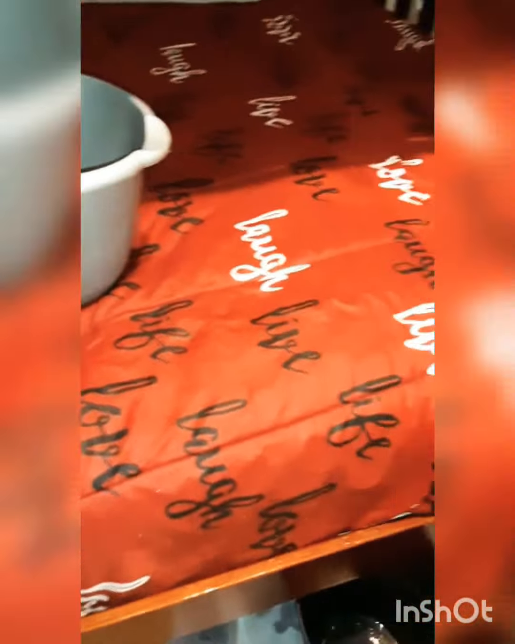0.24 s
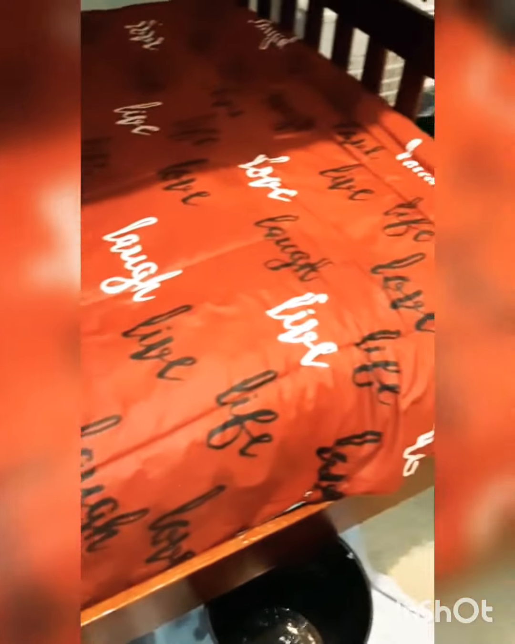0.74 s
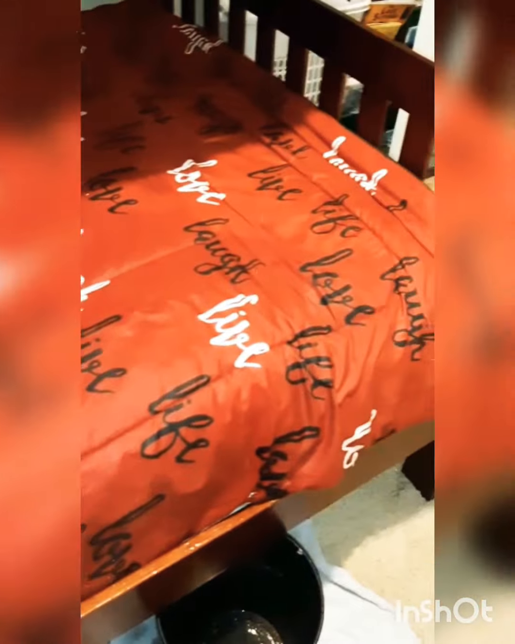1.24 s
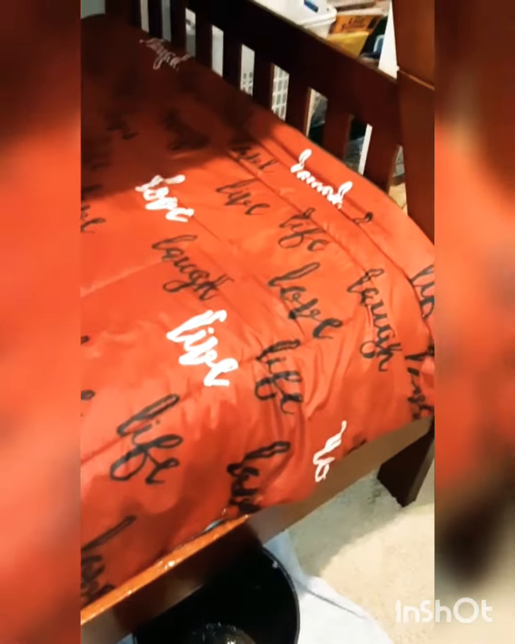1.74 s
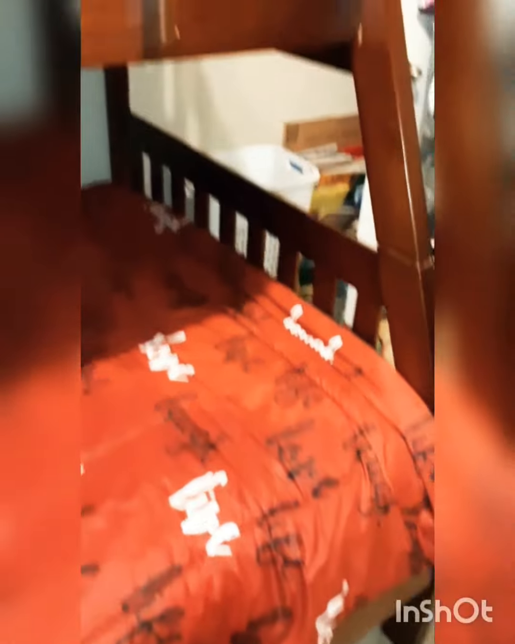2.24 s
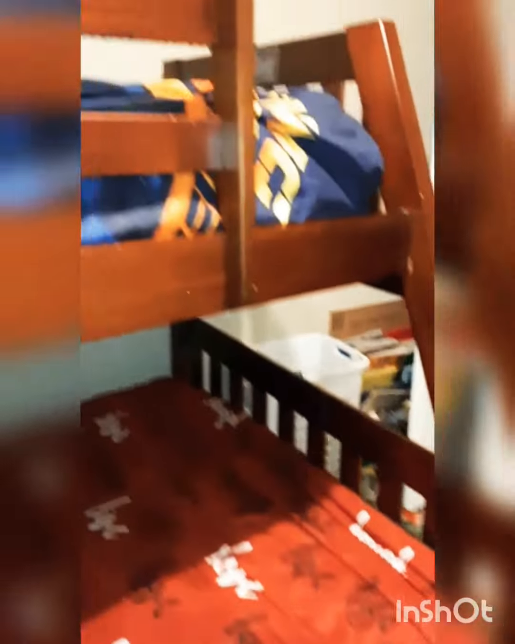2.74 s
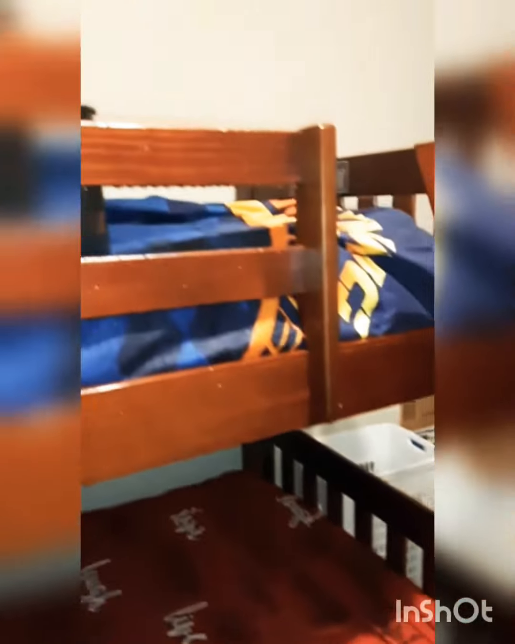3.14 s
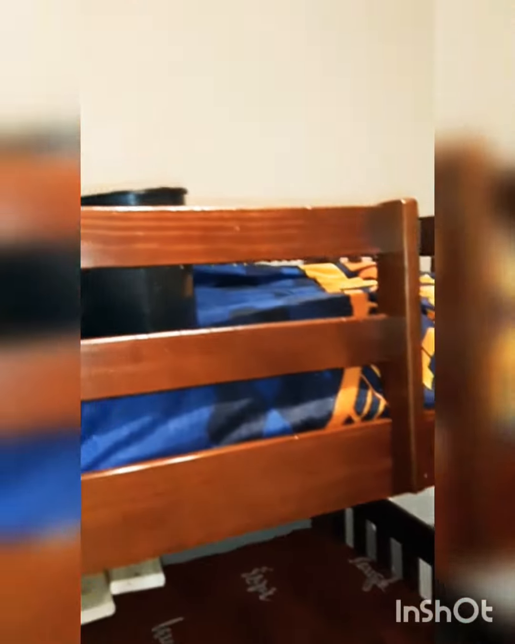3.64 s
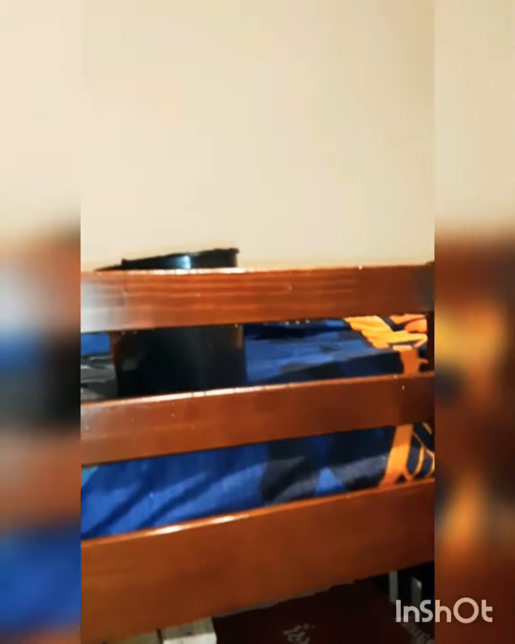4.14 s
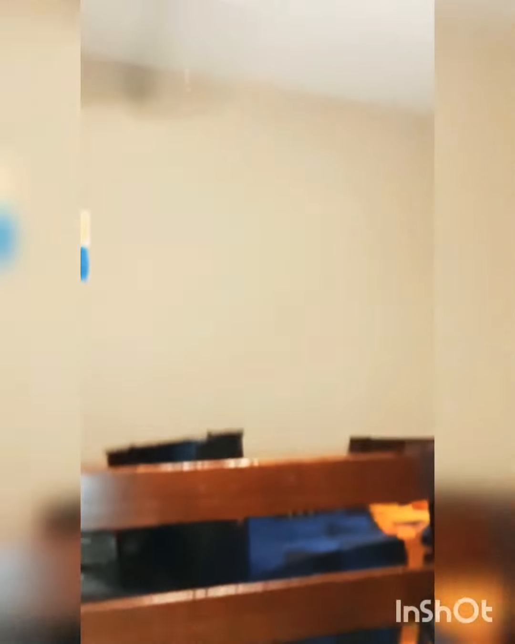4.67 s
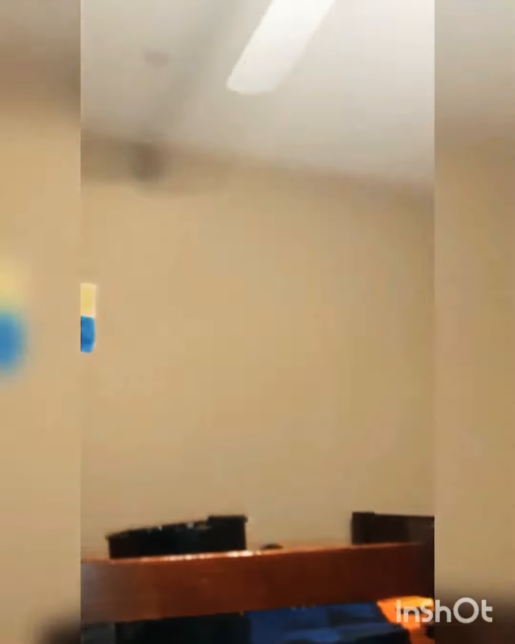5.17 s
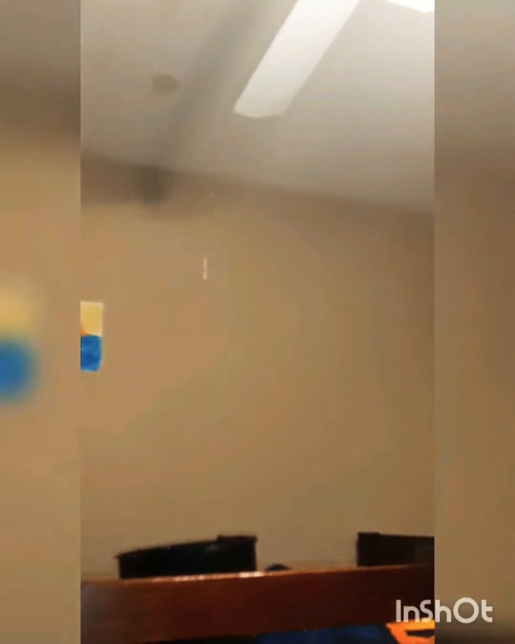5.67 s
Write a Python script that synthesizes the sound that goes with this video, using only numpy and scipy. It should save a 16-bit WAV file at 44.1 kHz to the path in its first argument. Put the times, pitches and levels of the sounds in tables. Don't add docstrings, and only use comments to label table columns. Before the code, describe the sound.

Water drips rapidly and unevenly into a part-filled bucket in a quiet bedroom, heard from close by on a slowly turning handheld stereo microphone. From 0 to 1 s come light ticks, small splashes and a few plinks, with a small handling click near 0.35 s. Around 1.2 to 1.4 s, stronger drops splash, followed by hollow glugs; another firm one lands near 1.9 s. A tight cluster of plops and bright spray comes at 2.4 to 2.7 s. From about 3 s the dripping thickens, with clear high plinks near 3.1, 3.9, 4.25 and 4.6 s, and a faint puff of air around 3.25 s. A sharp bubbling pop sounds near 5.25 s, then quick plinks and splashes continue to the end, about 5.9 s. Fine crackling spray, short room reflections, dull finger taps and a barely audible hum fill the background.

```python
import sys
import numpy as np
from scipy import signal
from scipy.fft import rfft, irfft
from scipy.io import wavfile
from scipy.ndimage import uniform_filter1d, map_coordinates

SR = 44100
rng = np.random.default_rng(int(sys.argv[2]) if len(sys.argv) > 2 else 0)


def field_ratio(decibels):
    return 10 ** (np.asarray(decibels, dtype=float) / 20)


def dump_mix(stems):
    frames = np.atleast_2d(stems).T
    limited = np.clip(frames, -1, 1)
    pcm = np.round(limited * 32767).astype(np.int16)
    wavfile.write(sys.argv[1], SR, pcm)


N = 260631

# (frequency [Hz], density [dB per Hz])
SPRAY_SPECTRUM = [(880, -19), (1500, -2), (1850, -13.5), (2010, 3.5), (2170, -5), (2530, -1.5),
                  (3380, -7.5), (4430, -6.5), (6890, -8), (7770, -8), (8860, -17), (11700, -2), (15100, -8),
                  (16000, 12.5), (16500, -62)]


def at_hz(points, hz):
    table_hz, values = np.transpose(points)
    return np.interp(np.log(hz), np.log(table_hz), values)


def in_time(rows):
    s, *columns = np.transpose(rows)
    return [np.interp(np.arange(N) / SR, s, column) for column in columns]


def band_of(x, order, edges_hz, kind="band"):
    return signal.sosfilt(signal.butter(order, edges_hz, kind, fs=SR, output="sos"), x)


def coloured(x, spectrum):
    hz = np.maximum(np.arange(N // 2 + 1) * SR / N, 1)
    y = irfft(rfft(x) * field_ratio(at_hz(spectrum, hz)), N)
    return y / np.std(y)


def resonance(x, hz, width_hz):
    r = np.exp(-np.pi * width_hz / SR)
    zeros = (1 - r * r) / 2 * np.array([1, 0, -1])
    poles = [1, -2 * r * np.cos(2 * np.pi * hz / SR), r * r]
    return signal.lfilter(zeros, poles, x)


def add(out, s, sound):
    i = min(round(s * SR), N)
    out[..., i:i + len(sound)] += sound[:N - i]


def room_tone():
    # (frequency [Hz], level [dB])
    air_spectrum = [
        (12, -48),
        (20, -11),
        (107, -1.5),
        (209, -9),
        (690, 6.5),
        (1350, 7),
        (1500, -1.5),
        (1950, 5),
        (3300, -120),
    ]
    # (time [s], level [dB])
    far_hum = [
        (0, -117),
        (4.2, -77),
        (4.5, -69),
        (5.91, -81),
    ]
    common, left, right, rumble, hum = rng.standard_normal((5, N))
    air = np.array([coloured(common + 1.02 * own, air_spectrum) for own in (left, right)])
    air[1] += field_ratio(-24) * coloured(rumble, [(15, 12), (40, -8), (60, 26), (90, 19), (150, -19)])
    steady_hum = field_ratio(-50) * resonance(hum, 115.4, width_hz=24)
    appliance = field_ratio(in_time(far_hum)[0] + 29) * resonance(hum, 166.6, width_hz=5)
    return field_ratio(-60) * air + steady_hum + appliance


def droplets(per_s, spread_db):
    sizes = field_ratio(spread_db * np.minimum(rng.exponential(1, N), 4)) * rng.choice([-1, 1], N)
    spray = coloured(sizes * (rng.random(N) < per_s / SR), SPRAY_SPECTRUM)
    cuts = ((3000, "low"), ([3000, 8800], "band"), (8800, "high"))
    return np.array([band_of(spray, 3, hz, kind) for hz, kind in cuts])


def patchy(x):
    patchy_db, drift = 1.8, 1300
    edges, out = np.geomspace(900, 17000, 9), 0
    chance = uniform_filter1d(rng.standard_normal(N), size=drift) * np.sqrt(drift)
    for k, band in enumerate(zip(edges, edges[1:])):
        gain = field_ratio(patchy_db * np.clip(np.roll(chance, k * N // 8), -2, 2))
        out = out + gain * band_of(x, 2, band)
    return out


def patter(per_s):
    sizes = field_ratio(2.5 * np.minimum(rng.exponential(1, N), 1.8)) * (rng.random(N) < per_s / SR)
    pitches, dealt = np.geomspace(2800, 15000, 8), rng.integers(0, 8, N)
    rings = 0
    for k, hz in enumerate(pitches):
        rings = rings + resonance(sizes * (dealt == k) + 1e-18, hz, hz / 3) / hz
    return field_ratio(-54) * coloured(rings, SPRAY_SPECTRUM)


def bubble(db, hz, rise, life_ms, onset_ms, shed_ms):
    life = max(life_ms, 2) / 1000
    t = np.arange(int(2 * life * SR)) / SR
    pitch = hz * 2 ** (rise * np.minimum(t / life, 1.2))
    since = t % (shed_ms / 1000)
    onset = 1 - np.exp(-1000 * since / onset_ms)
    decay = np.exp(-1.5 * (t / life) ** 2 - since / 0.098)
    return field_ratio(db) * onset * decay * np.sin(2 * np.pi * np.cumsum(pitch) / SR)


def bubbles(table, start_share, onset_ms, gain_db, swarm_db, below, above, swarm_ms):
    out, chance = np.zeros(N), rng.random((len(table), 5, 4))
    shedding = rng.uniform(14, 32, len(table))
    for (s, db, hz, rise, life_ms), swarm, shed_ms in zip(table, chance, shedding):
        add(out, s, bubble(db + gain_db, start_share * hz, rise, life_ms, onset_ms, shed_ms))
        for later, height, strength, climb in swarm:
            pitch_hz = hz * 2 ** (rise * later - below + (below + above * rise) * height)
            small_db = db + swarm_db - 13.8 * strength
            small = bubble(small_db, pitch_hz, 0.34 * climb, 12000 / pitch_hz, onset_ms, shed_ms)
            add(out, s + later ** 2 * (life_ms + swarm_ms) / 1000, small)
    return out


def large_bubbles():
    # (time [s], peak level [dB], first pitch [Hz], life [ms])
    glugs = [(.14, -62, 700, 60), (.51, -45, 1280, 36), (1.3, -53.5, 413, 117), (1.372, -45.5, 1098, 21),
             (1.407, -45, 690, 40), (1.56, -55, 685, 54), (1.84, -50, 1206, 43), (1.894, -48.5, 723, 35),
             (1.935, -40.5, 1038, 19.5), (.01, -62, 972, 53), (2.424, -38.5, 584, 12.1),
             (2.686, -48, 642.5, 40), (4.735, -45, 1430, 11), (2.957, -49, 602, 96),
             (2.975, -43.5, 900, 30), (3.2, -49, 602.6, 67), (3.575, -56.5, 723, 55), (3.941, -49, 700, 20),
             (4.039, -50.5, 722, 42), (4.24, -44, 616.5, 41.5), (4.731, -43.5, 1023, 38),
             (5.098, -53, 858, 43), (5.145, -55, 482, 21), (5.258, -32, 1094, 10), (5.26, -61, 639, 49),
             (5.33, -42, 1200, 20), (5.39, -49.5, 814, 41), (5.461, -43.5, 965, 33.4),
             (5.777, -53, 756, 20), (5.88, -49.5, 605, 19)]
    # (time [s], peak level [dB], pitch [Hz], life [ms])
    plops = [(.198, -46, 1020, 21), (1.075, -62, 1580, 15), (1.175, -59.5, 1120, 45),
             (1.666, -49.5, 1382, 20.6), (1.834, -59, 500, 39), (2.25, -48.5, 1340, 24),
             (2.645, -72, 1370, 25), (2.7, -47.5, 949, 28), (3.17, -47.5, 683, 40), (3.25, -57, 1265, 32),
             (3.38, -57.5, 720, 13.6), (3.56, -61.5, 505, 28.4), (2.655, -55.5, 780, 12.7),
             (3.88, -55.5, 1580, 7.9), (4.12, -61, 593, 205), (4.165, -54, 1065, 13),
             (4.374, -53.5, 1243, 26.8), (4.431, -49.5, 1010, 15.3), (4.62, -49.5, 1453, 30),
             (4.65, -48.5, 1016, 20), (4.733, -52.5, 780, 36), (4.907, -63, 1526, 23),
             (5.184, -46, 745, 23.7), (5.258, -60, 1990, 15), (5.325, -47.5, 767, 55),
             (5.55, -52.5, 793, 13.6), (2.437, -36, 753, 12.4), (2.475, -69, 770, 20),
             (5.275, -50, 1670, 11.3), (5.29, -44, 1250, 16), (5.35, -53, 1695, 42),
             (5.478, -42.5, 1540, 5.8), (.12, -61, 760, 10.7), (.76, -50, 1330, 8.1),
             (1.448, -48, 1096, 17), (1.48, -49, 1346, 21), (1.53, -54, 1115, 29), (1.6, -57, 850, 17.6),
             (.28, -55, 1113, 13), (4.18, -57.5, 630, 40), (2.48, -53, 1200, 15), (4.56, -66, 701, 35)]
    table = []
    for rows, rise_octaves in ((glugs, 0.75), (plops, 0.1466)):
        table += [(s, db, hz, rise_octaves, life_ms) for s, db, hz, life_ms in rows]
    return bubbles(table, start_share=1, onset_ms=0.42, gain_db=-2.5,
                   swarm_db=-4, below=0.16, above=0.3, swarm_ms=18)


def small_bubbles():
    # (time [s], peak level [dB], pitch [Hz])
    plinks = [(.478, -38, 2080), (.52, -33, 2254), (.685, -43, 2630), (.839, -47, 3260),
              (1.166, -33.5, 2704), (1.373, -38.5, 2700), (1.824, -37.5, 1990), (2.052, -43, 2670),
              (2.236, -53.5, 2250), (2.642, -35.5, 1586), (2.78, -39, 2030), (3.018, -35, 1350),
              (3.119, -26.5, 2550), (3.135, -32.5, 2183), (3.15, -62, 2590), (3.535, -36, 2590),
              (3.691, -40, 3010), (3.989, -41, 2110), (4.17, -52, 2200), (4.241, -27.5, 2550),
              (4.431, -36.5, 2600), (4.614, -28.5, 2490), (4.728, -53, 2370), (4.783, -37, 2360),
              (4.856, -30, 2506), (4.962, -39, 2410), (5.059, -43, 2180), (5.11, -42, 2210),
              (5.131, -33.5, 2450), (5.326, -39, 2930), (5.696, -37, 2023), (5.795, -32.5, 3250),
              (1.248, -51.5, 2020), (5.27, -50, 2500), (5.612, -34, 2520), (5.555, -40.5, 2360),
              (4.63, -35, 2880), (4.655, -36.5, 2260), (2.44, -37.5, 2910), (3.321, -33, 2635),
              (3.468, -40.5, 2770), (.226, -41.5, 2770), (.53, -39, 1590), (2.417, -41, 2220),
              (5.268, -35, 1750), (5.3, -41.5, 1890), (5.355, -38.5, 1580), (2.645, -42, 2020),
              (2.235, -46, 2150), (3.16, -45, 2200), (4.66, -52, 2700)]
    # (time [s], peak level [dB], pitch [Hz])
    tinks = [(.021, -42, 4600), (.162, -39, 3370), (.194, -33, 3210), (.274, -47, 4460),
             (.374, -34.5, 5070), (.76, -41, 4300), (.928, -47, 4240), (.976, -35, 5600),
             (1.045, -37.5, 3180), (1.391, -30, 4780), (1.583, -45, 4500), (1.742, -40.5, 4580),
             (1.929, -33, 4340), (2.19, -36.5, 5010), (2.357, -34, 4240), (2.531, -30.5, 3480),
             (2.971, -44.5, 3420), (3.067, -29, 4800), (3.32, -30, 3740), (3.772, -36, 3300),
             (3.872, -27, 4150), (4.044, -33, 5670), (4.106, -37, 3400), (4.92, -33.5, 4980),
             (5.014, -35, 4810), (5.372, -33, 3950), (5.418, -33.5, 3330), (5.463, -35, 4430),
             (5.61, -29, 4960), (5.645, -31, 4430), (.226, -42, 4450), (2.641, -40, 3960),
             (2.66, -42, 4500), (2.452, -41, 3280), (4.256, -28, 4470), (1.41, -36, 4830),
             (3.34, -41, 3720), (5.235, -36, 4620), (5.19, -50, 3550), (5.285, -38, 3340),
             (3.125, -36, 3580), (2.277, -55, 3500)]
    table = []
    for rows, life_ms in ((plinks, 17), (tinks, 8.9)):
        table += [(s, db, hz, 0.25, life_ms) for s, db, hz in rows]
    return bubbles(table, start_share=0.92, onset_ms=0.15, gain_db=-10.5,
                   swarm_db=-6, below=0.3, above=0.7, swarm_ms=8)


def splashes():
    # (time [s], peak level [dB], coarse spray [dB], mist [dB])
    specks = [(0.071, -37.5, -16, -8.5), (0.3745, -41, -27, -10), (0.6094, -68, 4, -9),
              (0.7074, -56, -4, 3), (0.8355, -33.5, -15, -3.5), (1.004, -35, -30, -13),
              (1.1403, -48, -22, -7), (2.19, -45, -35, -2.5), (2.355, -35.5, -30, -21),
              (2.962, -37.5, -15, -11), (4.1033, -32, -1.5, -7), (4.197, -43, -6, -2.5),
              (4.525, -39, -7.5, -5), (4.7974, -38, -7, -6), (4.863, -44, 11, -6),
              (4.9667, -38.5, -30, -5.5), (5.1372, -39, 6, -6.5), (5.185, -44, -3, -12),
              (5.461, -34, -16, -10), (5.8856, -38, -14, -7)]
    small_drops = [(0.0358, -37.5, 0.5, -7.5), (0.1154, -37.5, -45, -11), (0.187, -26.5, -14, -16),
                   (0.4124, -43, 3.5, -2.5), (0.523, -44, 11.5, -3), (0.5842, -34, -16, -10.5),
                   (0.925, -38, -25, -22), (0.9787, -34, -10, -33), (1.067, -38.5, 0, -12),
                   (1.51, -39, 5.5, -6.5), (1.552, -40, 1.5, -6.5), (1.6274, -35, -5.5, -11.5),
                   (2.2373, -31.5, 3.5, -7), (2.574, -43.5, -40, -12), (2.8266, -34, -0.5, -13.5),
                   (2.902, -40.5, -27, -24), (3.1725, -40.5, -12, -9), (3.4495, -55.5, 16, 7),
                   (3.473, -57, 7, 7), (3.511, -49, -8, -17), (3.7645, -43.5, -39, -4),
                   (4.2435, -30.5, 0, -4.5), (4.375, -39, 3, -7), (4.4376, -32.5, 4, -10.5),
                   (5.0214, -42, -19, -8)]
    full_drops = [(0.323, -42.5, -9, -12), (0.744, -44, -18, -10), (1.2468, -32, -4, -34),
                  (1.305, -39.5, -20, -14), (1.3911, -25.5, -5, -23), (1.672, -37.5, -19, -27),
                  (1.822, -35, -13, -20), (2.0584, -38, -7, -23), (2.296, -37.5, -6, -14),
                  (2.4198, -27.5, -1, -10.5), (2.511, -42, 4, -6.5), (2.639, -28, 2.5, -14),
                  (2.7346, -37.5, 2, -9.5), (2.99, -33, -5, -19), (3.234, -34, 3.5, -21),
                  (3.5357, -34.5, 1.5, -17), (3.877, -33.5, 3.5, -15), (3.988, -35, -1, -17),
                  (4.3067, -34, 7, -14), (4.3564, -38, 2, -17), (4.5945, -38.5, -4, -14),
                  (4.6774, -37.5, -11, -13.5), (4.73, -38.5, 10, -13), (4.906, -36, -17, -15),
                  (5.552, -43, -5, -16), (5.6057, -36, -5, -4), (5.8297, -33.5, 6, -11)]
    heavy_drops = [(0.271, -41.5, -24, -28), (0.5, -36.5, -10, -18), (0.8184, -57, 5, 0),
                   (1.166, -35.5, -36, -21), (1.74, -40, -14, -43), (1.928, -29, 4, -22),
                   (2.0844, -38.5, -7, -29), (3.072, -32, -0.5, -24), (3.127, -37.5, 6.5, -27),
                   (3.1552, -41, 11.5, -24), (3.326, -40.5, 11, -16), (3.3824, -39.5, -2.5, -17),
                   (3.6226, -40.5, -3, -33), (3.6913, -36, -1.5, -15), (3.8177, -32, 2, -39),
                   (3.858, -35.5, -6, -31), (4.0493, -31.5, -1, -41), (4.6166, -39, 7.5, -19),
                   (5.2376, -34.5, 1, -18), (5.3706, -37.5, 3, -14), (5.6451, -37.5, 4.5, -11)]
    spray_ms, halves_db = 6.4, 37
    swell_ms, linger_ms = 1.8, 18
    splash_db, all_coarse_db, all_mist_db, tick_db = 3, -6.5, 3, 5
    coarse, middle, top = bands = np.zeros((3, N))
    t = np.arange(SR // 8) / SR
    swell = 1 - np.exp(-1000 * t / swell_ms)
    for s, db, coarse_db, mist_db in specks + small_drops + full_drops + heavy_drops:
        length_ms = spray_ms * 2 ** (-(db + 40) / halves_db)
        burst = field_ratio(db + splash_db) * np.exp(-(600 * t / length_ms) ** 2.23) * swell
        add(coarse, s - .002, burst * field_ratio(coarse_db + all_coarse_db))
        add(middle, s - .002, burst)
        add(top, s - .002, burst * field_ratio(mist_db + all_mist_db))
    spray = np.sum(bands * droplets(per_s=3400, spread_db=2.5), axis=0)
    keep = np.exp(-1000 / linger_ms / SR)
    lingering = signal.lfilter([1 - keep], [1, -keep], bands)
    ticks = [np.sum(lingering * droplets(per_s=400, spread_db=-1.5), axis=0) for ear in range(2)]
    return patchy(spray), field_ratio(tick_db) * np.array(ticks)


def handling():
    # (time [s], peak level [dB], case pitch [Hz], t60 [ms])
    taps = [
        (0.043, -53.5, 404, 33),
        (0.354, -45, 1420, 21),
        (0.784, -61, 330, 120),
        (1.019, -55, 680, 77),
        (2.026, -54, 300, 140),
        (2.73, -53.5, 353, 42),
        (3.632, -52.5, 314.5, 250),
        (5.643, -53, 285, 270),
    ]
    # (time [s], level [dB])
    gust = [
        (3.18, -89),
        (3.266, -58),
        (3.45, -77),
    ]
    out, t = np.zeros(N), np.arange(SR // 8) / SR
    for s, db, hz, t60_ms in taps:
        modes = sum(np.sin(2 * np.pi * k * hz * t) for k in (.85, 1, 1.35)) / 2
        add(out, s, field_ratio(db - 60000 * t / t60_ms) * modes)
    s = np.arange(N) / SR
    blowing = (s > gust[0][0]) & (s < gust[-1][0])
    lumps = band_of(rng.standard_normal((2, N)), 2, [35, 120])
    ear_db = np.array([[-3], [4]])
    return out + blowing * field_ratio(in_time(gust)[0] + ear_db) * lumps / np.std(lumps)


def lone_bubbles():
    # (time [s], peak level [dB], first pitch [Hz], rise [octaves], life [ms])
    chirps = [(0.689, -46.5, 777, 0.034, 63), (2.2651, -35.5, 1750, 1, 17), (2.859, -32, 2050, 0.48, 12.7),
              (1.1, -36.5, 7700, 0.056, 6), (2.356, -33.5, 4300, .05, 4.5), (5.131, -41, 3900, 0.062, 6.7),
              (6.3, -51, 2300, .08, 6.7), (5.252, -42, 1950, 0.54, 12), (0.15, -49, 1300, 0.38, 34),
              (1.452, -38.5, 1220, 0.1, 12), (.73, -56.5, 860, 0.013, 21), (.186, -41, 7600, .02, 8),
              (3.121, -36, 2500, .1, 8), (4.241, -39, 2460, 0.059, 8.4), (4.613, -42, 2500, 0.095, 9.3),
              (5.2, -43, 1500, .05, 14), (5.182, -45, 754, .05, 16), (5.205, -47, 760, .05, 8.5),
              (0.18, -41, 1030, .05, 14), (2.21, -62.5, 800, .02, 50), (4.431, -44, 2500, 0.043, 9.3),
              (2.438, -46, 747, .05, 12), (3.79, -46, 3900, .05, 8), (3.805, -46, 3000, .05, 8),
              (3.895, -44, 3400, .05, 8), (3.928, -45, 3000, .05, 8), (4.058, -43, 2900, .05, 12),
              (3.96, -48, 1350, .1, 15), (4.857, -41, 2400, .05, 8), (2.416, -44, 2300, .1, 8),
              (.16, -50, 800, .45, 80), (1.93, -48, 1050, .1, 20), (1.38, -50, 1150, .1, 20),
              (1.073, -50, 1700, .05, 12), (3.383, -54, 800, .02, 30)]
    out = np.zeros(N)
    for s, *shape in chirps:
        add(out, s, bubble(*shape, onset_ms=1, shed_ms=130))
    return out


def bucket(water):
    # (frequency [Hz], width [Hz], level [dB])
    air_column = [
        (767, 23, -2.5),
        (1127, 64, -2.5),
        (1583, 77, -6.5),
        (2840, 130, -14.5),
        (4340, 69, -62),
        (7900, 117, 2.5),
    ]
    return water + sum(field_ratio(db) * resonance(water, hz, max(width, hz / 16)) for hz, width, db in air_column)


def echo_pattern(echo_db, build_ms, early_ms, early_db):
    # (frequency [Hz], t60 [s])
    reverb_time = [
        (300, 0.12),
        (800, 0.44),
        (2000, 0.24),
        (5000, 0.28),
        (12000, 0.3),
    ]
    # (frequency [Hz], share [0-1])
    likeness = [
        (300, .8),
        (700, .85),
        (1100, .45),
        (4000, .2),
        (12000, .08),
    ]
    t, echoes = np.arange(SR // 2) / SR, 0
    white = rng.standard_normal((2, 3, SR // 2))
    edges = 125 * 2 ** np.arange(0, 7.3, .5)
    for k, (low, high) in enumerate(zip(edges, edges[1:])):
        shared, *own = band_of(white[k % 2], 2, [low, high])
        hz = np.sqrt(low * high)
        alike = np.clip(at_hz(likeness, hz), 0, 1)
        both = np.sqrt(alike) * shared + np.sqrt(1 - alike) * np.array(own)
        echoes = echoes + both * field_ratio(-60 * t / at_hz(reverb_time, hz))
    early = 1 + field_ratio(early_db) * np.exp(-(1000 * t / early_ms) ** 2)
    echoes = echoes * (1 - np.exp(-1000 * t / build_ms)) * early
    response = field_ratio(echo_db) * echoes / np.sqrt(np.sum(echoes ** 2) / 2)
    response[:, 0] = field_ratio(-2.5)
    return response


def room(x, count):
    out, turn = 0, np.arange(N) / SR * 11 % count
    for k in range(count):
        away = np.abs((turn - k + count / 2) % count - count / 2)
        share = np.cos(np.pi / 2 * np.minimum(away, 1))
        pattern = echo_pattern(echo_db=4.5, build_ms=0.1, early_ms=21, early_db=-8)
        wet = signal.fftconvolve((share * x)[None], pattern, axes=1)
        wet[:, :wet.shape[1] - N] += .5 * wet[:, N:]
        out = out + wet[:, :N]
    return out


def ears(x):
    # (time [s], right ear lag [ms], left minus right [dB])
    bearing = [
        (0, 0.5, -4.5),
        (2.2, 0.41, -5),
        (2.8, 0.32, -3),
        (3.8, 0.049, -6.5),
        (4.7, 0.018, -4),
        (5.1, 0.33, -4.5),
        (5.91, 0.36, -6),
    ]
    lag_ms, balance_db = in_time(bearing)
    heard_at = np.arange(N) - lag_ms * SR / 1000
    x = np.array([x[0], map_coordinates(x[1], [heard_at], order=3, mode="nearest")])
    shaded = band_of(x, 1, [900, 7000])
    return x + shaded * (field_ratio(0.39 * balance_db * [[1], [-1]]) - 1)


def scene():
    clear = lone_bubbles()
    spray, ticks = splashes()
    water = spray + patchy(patter(per_s=700)) + .5 * clear
    water = water + small_bubbles() + large_bubbles()
    heard = room(bucket(water), count=4) + 1.2 * clear + ticks
    return ears(heard) + handling() + room_tone()


def hush(x, strength, least_db):
    hz, _, frames = signal.stft(x, SR, nperseg=512)
    power = np.mean(np.abs(frames) ** 2, axis=0)
    power = uniform_filter1d(uniform_filter1d(power, size=5, axis=0), size=3, axis=1)
    weight = np.interp(hz, [300, 550, 850, 1700, 4000], [0, 1, 1, .2, .2])
    floor = np.percentile(power, 15, axis=1, keepdims=True) * weight[:, None]
    gain = np.maximum(1 - strength * floor / (power + 1e-20), field_ratio(least_db))
    return signal.istft(frames * gain, SR, nperseg=512)[1][:, :N]


def low_pass(x):
    return signal.sosfilt(signal.butter(12, 17010, fs=SR, output="sos"), x)


def record(dry):
    left = signal.lfilter(*signal.butter(1, 70, "high", fs=SR), dry[0])
    quiet = hush(np.array([left, dry[1]]), strength=1.45, least_db=-20)
    mix = signal.sosfilt(signal.cheby2(12, 50, 16000, fs=SR, output="sos"), quiet)
    return low_pass(mix)


dry = scene()
out = record(dry)
dump_mix(out)
```